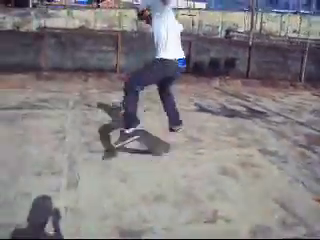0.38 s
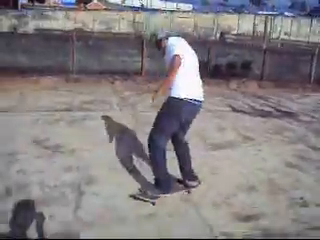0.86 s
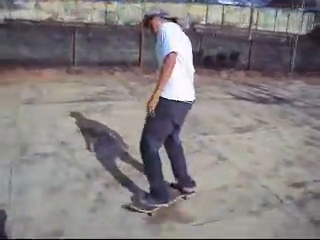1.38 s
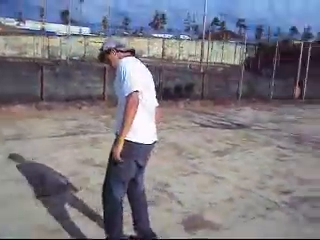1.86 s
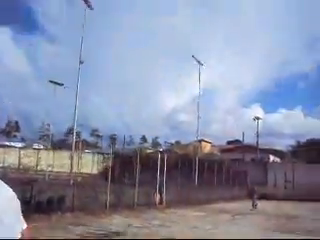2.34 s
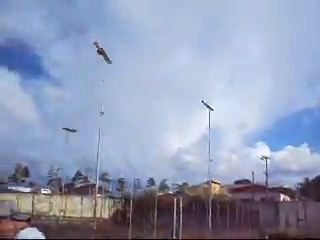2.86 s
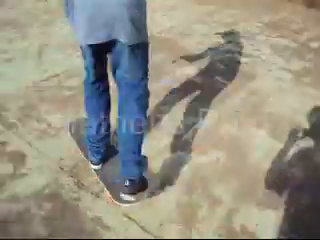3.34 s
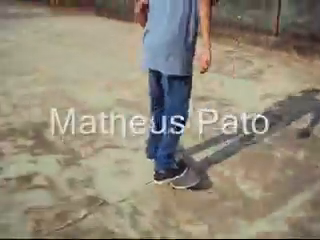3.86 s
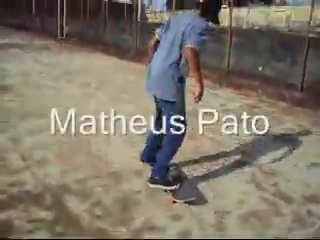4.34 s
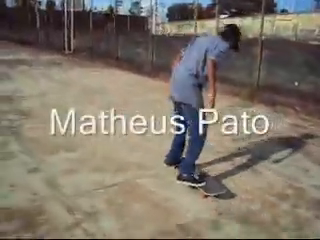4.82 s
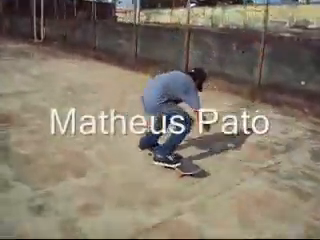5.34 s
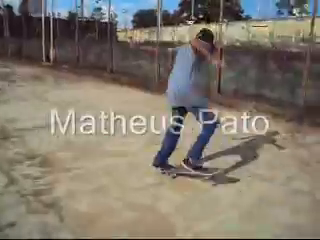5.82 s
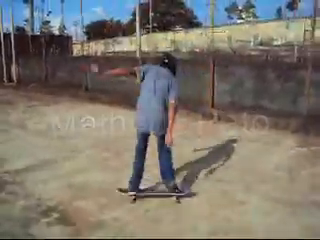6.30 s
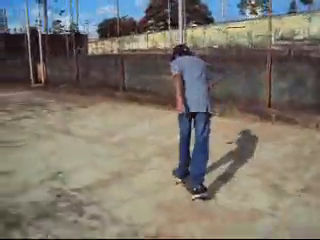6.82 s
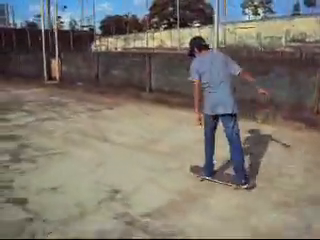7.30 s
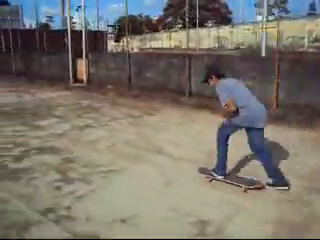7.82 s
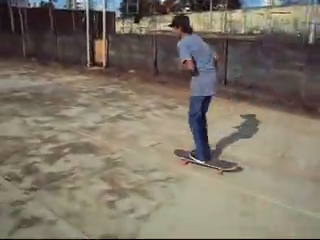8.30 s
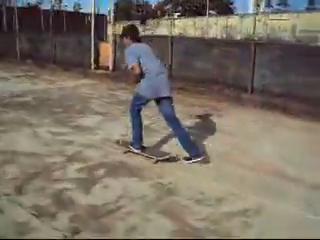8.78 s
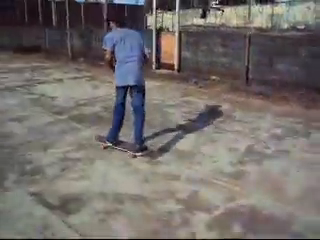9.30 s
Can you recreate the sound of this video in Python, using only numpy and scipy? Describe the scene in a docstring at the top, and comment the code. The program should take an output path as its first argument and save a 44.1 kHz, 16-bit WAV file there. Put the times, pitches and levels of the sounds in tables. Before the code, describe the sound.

A skateboard rolls gritty and low over rough concrete, clicking across cracks, then slams down in a cluster of hard clacks. Rolling eases, a faint engine speeds up far off, and the scene cuts abruptly to another board with a stamp, softer rolling, a louder landing and late knocks. Open court, light wind, low walls answering briefly, cheap small-camera microphone.

```python
"""A skateboard rolls over rough concrete in an open court, heard through a small camera.
From the start, grit drives the deck, wheels and trucks as filtered noise, under wind and open air; cracks,
clacks and hard contacts strike decaying modes, low walls answer, and shoe or wheel scuffs ring the metal.
A far engine, a swept tone, speeds up until the scene cuts to another rider and board at 3.2 s; soles stamp, a
bearing hisses in narrow noise, and the board lands hard again. The camera samples slowly, holds and clips."""
import sys
import numpy as np
from scipy import signal
from scipy.fft import rfft, irfft, next_fast_len
from scipy.io import wavfile
from scipy.ndimage import map_coordinates

SR = 44100
rng = np.random.default_rng(int(sys.argv[2]) if len(sys.argv) > 2 else 0)


def volts_from_db(level):
    """Convert decibel levels to linear amplitude ratios."""
    exponent = np.asarray(level, float) / 20
    return 10 ** exponent


def waveform_to_disk(signal):
    """Save audio, clipped to [-1, 1], as 16-bit WAV at the path in sys.argv[1]."""
    frames = np.transpose(np.atleast_2d(signal))
    scaled = np.clip(frames, -1, 1) * 32767
    samples = np.round(scaled).astype(np.int16)
    wavfile.write(sys.argv[1], SR, samples)


N = 426447

# What the board rings with, from the low body to the metal.
# Each row: centre in Hz, width in Hz before damping, relative level in dB.
RUMBLE_MODES = [(124, 97, -1), (152.7, 42.5, 7)]
FLEX_MODES = [(214, 246, 0.017), (387, 307, 0)]
DECK_MODES = [(490, 99, -5.5), (621, 152, 3), (658.5, 191, 1.5)]
NOSE_MODES = [(840, 62, 9.5), (980, 187, 4.5), (1167, 160, 6.5), (1202, 30, -2.5), (1350, 157, -7.5)]
WHEEL_MODES = [(1593, 870, 1), (2100, 1300, -2.3)]
TRUCK_MODES = [(2530, 560, -4), (2750, 230, 0.5), (3240, 250, -2.5), (3630, 127, -1.5), (4800, 3000, -11.5)]
# A sole stamps on the board. Each row: start in seconds, strength in dB before each part's own share.
SOLE_THUDS = [(1.35, -17.5), (3.215, -14), (4.08, -12), (4.101, -9), (6.264, -10), (6.276, -10)]


def unit(x):
    """Scales a sound to rms 1."""
    return x / np.sqrt(np.mean(x ** 2, -1, keepdims=True) + 1e-20)


def along(points, hz):
    """Reads a curve of (Hz, value) points on a log frequency axis."""
    f, v = np.transpose(points)
    return np.interp(np.log(hz + 1), np.log(f + 1), v)


def wobble(rate):
    """A smooth random curve, rate knots a second."""
    knots = rng.standard_normal(int(N * rate / SR) + 4)
    return map_coordinates(knots, [np.arange(N) * rate / SR])


def filtered(x, response):
    """Filters x by a complex response of frequency."""
    m = next_fast_len(N + SR // 2)
    return irfft(rfft(x, m) * response(np.fft.rfftfreq(m, 1 / SR)), m)[..., :N]


def resonance(f, hz, width_hz):
    """One causal resonance on the frequency grid f."""
    return 1j * f * width_hz / (hz * hz - f * f + 1j * f * width_hz)


def ringing(x, modes, steep):
    """Drives a row of modes with x; a wide resonance applied twice steepens the skirts."""
    low, high = modes[0][0], modes[-1][0]

    def response(f):
        skirt = resonance(f, np.sqrt(low * high), steep * high) ** 2
        # neighbouring modes alternate in sign
        row = sum((-1) ** k * volts_from_db(db) * resonance(f, hz, width) for k, (hz, width, db) in enumerate(modes))
        return skirt * row

    return filtered(x, response)


def grit(per_second, spread_db, hiss):
    """Stones under the wheels: scattered pushes of unequal size over fine sand."""
    hit = rng.random(N) < per_second / SR
    size = volts_from_db(spread_db * np.minimum(rng.exponential(size=N), 4)) * rng.standard_normal(N)
    return unit(unit(hit * size) + hiss * rng.standard_normal(N))


def rolling():
    """Rough and smooth patches of ground shake each part of the board; its low body booms as the load shifts."""
    # Two lists, first one rider and then another.
    # Each row: time in seconds, rolling strength in dB, ring of the deck in dB.
    rides = [
        [(0.0, -36, -29), (0.38, -36, -28), (0.74, -36, -30), (0.89, -39.5, -37.5), (1.15, -44.5, -38),
         (1.43, -43.5, -32.5), (1.82, -43.5, -37.5), (2.02, -37.5, -34), (2.6, -45, -33), (3.06, -41.5, -32.5),
         (3.19, -44.5, -29)],
        [(3.2, -38, -42), (3.36, -42.5, -51), (3.79, -35.5, -61), (4.05, -48.5, -61), (4.3, -43.5, -42.5),
         (4.62, -42.5, -29), (4.91, -44.5, -38.5), (5.42, -42.5, -33), (5.85, -43, -32), (6.32, -36.5, -31),
         (7.02, -44.5, -35), (7.78, -41.5, -33.5), (8.41, -44.5, -35), (8.86, -33.5, -27.5), (9.11, -40.5, -30),
         (9.49, -36.5, -27), (9.67, -42, -27)],
    ]
    # Treble of the ride. Each row: time in seconds, wheels in dB, trucks in dB.
    whir = [(0.0, -62, -53), (0.75, -69, -53), (0.94, -57, -62), (1.35, -72, -61.5), (3.01, -73, -63),
            (3.34, -63, -56.5), (3.74, -54.5, -62), (4.66, -49.5, -55.5), (5.3, -65, -60), (6.57, -62, -58),
            (7.41, -70, -68.5), (8.73, -59.5, -60), (8.83, -48, -56.5), (9.67, -78, -58)]
    # Booms under a shifting load. Each row: peak in seconds, rise in seconds, fall in seconds, level in dB.
    load_booms = [(.45, .5, 0.41, -45), (1.47, 0.29, .15, -42), (2.1, 0.22, 0.32, -47),
                  (3.3, 0.14, 0.54, -38), (4.08, 0.066, 0.18, -32), (5.15, 0.46, 0.64, -35),
                  (6.1, 0.14, 0.28, -32.5), (6.45, 0.48, 0.21, -31.5), (7.63, 0.56, 0.31, -36),
                  (8.85, 0.14, 0.16, -36)]
    rumble_db, flex_db, nose_db = -5.5, 1, -0.56  # over the rolling strength

    t = np.arange(N) / SR
    s, *controls = np.vstack(rides).T
    strength_db, deck_db = [np.interp(t, s, c) for c in controls]
    s, *treble = np.transpose(whir)
    wheels_db, trucks_db = [np.interp(t, s, c) for c in treble]
    boom = sum(volts_from_db(db) * np.interp(t, [s - rise, s, s + fall], [0, 1, 0]) ** 2
               for s, rise, fall, db in load_booms)
    levels = [volts_from_db(strength_db + rumble_db) + boom, volts_from_db(strength_db + flex_db), volts_from_db(deck_db),
              volts_from_db(strength_db + nose_db), volts_from_db(wheels_db), volts_from_db(trucks_db)]

    ground_db = 1.04 * wobble(9.0) + 1.63 * wobble(40)
    stones = grit(per_second=500, spread_db=0.5, hiss=0.95)
    parts = [RUMBLE_MODES, FLEX_MODES, DECK_MODES, NOSE_MODES, WHEEL_MODES, TRUCK_MODES]
    felt = [0.12, 0.37, 1.37, 0.82, 3.6, 0.91]  # stones shake the stiff parts; soft low modes average them
    out = np.zeros(N)
    for modes, level, share in zip(parts, levels, felt):
        own = 0.92 * rng.standard_normal(N)  # each part also feels its own wheel
        roughness = volts_from_db(ground_db + 0.92 * wobble(12))
        out += level * unit(ringing(roughness * (share * stones + own), modes, steep=1.13))
    return out


def air():
    """Open air as shaped noise, wind buffeting as low resonant noise, and a far engine as a gliding tone."""
    # Wind and far town. Each row: frequency in Hz, relative noise density in dB.
    background = [(15, -29), (25, -6), (49, -4.5), (173, 2.5), (242, -1), (340, -11.5), (570, -5.5),
                  (697, -2.5), (2880, -37), (3290, -25), (5400, -65), (7020, -72), (11900, -120)]
    # Buffeting on the microphone. Each row: time in seconds, level in dB before gusts.
    buffeting = [(0.0, -33.5), (0.62, -38.5), (0.99, -45), (2.96, -45), (3.37, -53), (4.87, -62),
                 (8.05, -46.5), (8.6, -47), (8.85, -42.5), (9.67, -47)]
    # Far engine. Each row: time in seconds, pitch in Hz before wander, level in dB before wander.
    far_engine = [(1.55, 81.2, -41.5), (2.2, 81.5, -44), (2.546, 88.8, -35), (2.8, 92, -41.5),
                  (3.2, 97, -37)]
    gust_db = 2.5

    t = np.arange(N) / SR
    noise = unit(filtered(rng.standard_normal(N), lambda hz: volts_from_db(along(background, hz))))
    noise_level = volts_from_db(-42.5 + 0.64 * wobble(2.46))

    wind = unit(ringing(rng.standard_normal(N), [(44.6, 11, 0), (83, 180, 0)], steep=2.05))
    wind_level = volts_from_db(np.interp(t, *np.transpose(buffeting)) + gust_db * wobble(2.44))

    s, hz, db = np.transpose(far_engine)
    phase = 2 * np.pi * np.cumsum(np.interp(t, s, hz) + 0.74 * wobble(4.0)) / SR
    engine_level = volts_from_db(np.interp(t, s, db, -120, -120) + 2.8 * wobble(8.96))
    engine = engine_level * (np.sin(phase) + 0.13 * np.sin(phase / 2))
    return noise_level * noise + wind_level * wind + engine


def contacts():
    """All blows as (s, deck dB, flex dB, nose dB, metal dB, metal ring Hz, contact s, damping)."""
    # Wheels drop into cracks. Each row: start in seconds, deck in dB, flex in dB, metal in dB.
    cracks = [(.214, 0.5, -6, -25), (.424, -8, -12, -40), (.595, -16, -9, -48), (1.399, -8, -21, -25),
              (1.865, -12, -29, -53), (2.01, -11.5, -18, -36), (2.235, -15, -41, -32),
              (2.533, -9.5, -14, -34), (2.56, 0, -5.5, -25.5), (2.577, -8.5, -27, -45),
              (2.756, -5.5, -7.5, -31), (5.054, -3, -2.5, -28), (5.31, -11, -10, -40),
              (5.698, -11, -42, -23.5), (6.254, -11, -28, -33), (6.267, -16.5, -10, -47),
              (6.626, -13, -14, -23.5), (7.61, -15.5, -27, -50), (7.791, -23, -13.5, -46),
              (8.691, 3.2, -11, -24), (8.745, -12, -21, -33), (8.765, -8, -22, -29), (8.794, -13, -27, -42),
              (9.122, -22, -28, -31), (9.306, -10, -34, -33), (9.336, -7, -31, -38)]
    # An edge or axle clacks, or the nose rattles under a scuff.
    # Each row: start in seconds, nose in dB, metal in dB, body in dB.
    clacks = [(.722, -21, -12.5, -18), (0.896, -15.5, -28, -31), (2.053, -17, -19, -10),
              (2.033, -16, -35, -26), (2.038, -20, -34, -30), (2.063, -20, -36, -22),
              (2.075, -23, -35, -26), (2.268, -23, -36, -16), (2.279, -20, -38, -26),
              (2.296, -21, -34, -26), (2.974, -17, -16.5, -28), (2.993, -11, 0.5, -14),
              (3.013, -21, -5, -19), (3.423, -13.5, -13, -26), (4.06, -21.5, -42, -38),
              (4.079, -16.5, -28, -27), (5.114, -23, -36, -14), (5.322, -25, -23, -13),
              (5.646, -18, -28, -24), (6.043, -14.5, -6, -16), (6.796, -9, -16.5, -42),
              (6.822, -18.5, -40, -37), (7.43, -20.5, -38, -35), (8.934, -27, -23, -14),
              (9.251, -31, -38, -38)]
    # Hard contacts: board landings, and a foot set down at 3.88 s.
    # Each row: start in seconds, deck in dB, flex in dB, nose in dB, metal in dB.
    hard_contacts = [(.819, -7, 1.5, 0, -6.5), (.823, -2.5, -29, -26, -20), (.828, -6, -0.5, 0, -9),
                     (.852, -25, 3.5, -4, -11), (.859, -18, -15, 9, -1), (0.874, -16, -3, -32, -38),
                     (3.88, -9.5, -26, -11, -27), (3.884, -7, -24, -13, -26), (6.364, -18, -10, -7, -20),
                     (6.372, -16, -16, -20, -22), (6.385, -17, -9, -8, -19), (6.398, 4.5, -3, 2.5, -1.5),
                     (6.418, -5, 4, 1, -1), (6.425, 6.5, -21, -23, -7), (6.431, 2.5, -15, 1.5, 2.5),
                     (6.452, -27, -6, -9, -29), (8.679, -2.6, -4, -11, -37), (8.846, 2.5, -13, -30, -18),
                     (8.858, 7, -25, -30, -13.5), (8.869, -10, -15, -25, -34)]
    # Share of each part under a sole: deck, flex, nose and metal, in dB.
    sole_db = [-31, -1.5, -17, -27]
    # Ring of the metal in hard contacts: first board in Hz, second board in Hz.
    hard_hz = [3100, 2180]
    second_s = 3.2  # when the scene cuts to the other rider and board
    crack_nose_db, clack_flex_db = -9.5, -8  # nose over the metal, flex under the body
    crack_hz, clack_hz = 2690, 1900  # ring of the metal
    contact_s, clack_s = 0.0035, 0.0031  # grinding at 0 dB, before each part's share; hard edges part sooner
    damping, clack_damping = 1.4, 2.2  # widening of the modes under load; a pinched edge rings least

    usual = (crack_hz, contact_s, damping)
    blow_list = [(s, deck, flex, metal + crack_nose_db, metal, *usual) for s, deck, flex, metal in cracks]
    blow_list += [(s, body, body + clack_flex_db, nose, metal, clack_hz, clack_s, clack_damping)
                  for s, nose, metal, body in clacks]
    blow_list += [(s, *np.add(db, sole_db), *usual) for s, db in SOLE_THUDS]
    blow_list += [(*row, hard_hz[int(row[0] > second_s)], contact_s, damping) for row in hard_contacts]
    return blow_list


def struck(modes, damping, hard):
    """Spectrum of one blow: modes start together at new strengths; a rounded contact cuts far above them."""
    hz, width, db = np.transpose(modes)[..., None]
    t, f = np.arange(4096) / SR, np.fft.rfftfreq(8192, 1 / SR)
    luck = rng.standard_normal((2, *hz.shape))
    strength = width * volts_from_db(db + 3 * luck[0])
    decay = np.exp(-np.pi * width * damping * t)
    ring = strength * np.cos(2 * np.pi * hz * t + 0.62 * luck[1]) * decay
    rounded = np.exp(-(f / (hard * hz.max())) ** 2 - 2j * np.pi * f * .001)  # with 1 ms of delay
    whole = rfft(ring.sum(0), 8192) * rounded
    return whole / abs(irfft(whole)).max()


def blows():
    """Each blow is a sharp push and a short grinding contact, slightly longer the harder it is."""
    t, out = np.arange(4096) / SR, np.zeros(N + 8192)
    linger = [1.28, 0.97, 1.3, 1.1]  # contact time as deck, flex, nose and metal feel it
    for s, *db, ring_hz, contact_s, damping in contacts():
        seconds = contact_s * volts_from_db(0.067 * max(db))
        noise = rng.standard_normal(len(t))
        # the metal that was hit rings most: 12 dB less for each octave away
        metal = [(hz, width, level - 12 * abs(np.log2(hz / ring_hz)))
                 for hz, width, level in WHEEL_MODES + TRUCK_MODES]
        parts = [DECK_MODES, RUMBLE_MODES + FLEX_MODES, NOSE_MODES, metal]
        for modes, part_db, slow in zip(parts, db, linger):
            grind = 0.41 * noise * np.exp(-t / (slow * seconds))
            grind[0] -= 3.5  # the sharp push
            force = rfft(grind / np.linalg.norm(grind), 8192)
            out[round(s * SR):][:8192] += volts_from_db(part_db) * irfft(force * struck(modes, damping, hard=1.52))
    # the blows carry little deep bass
    return filtered(out[:N], lambda f: (1j * f / (125 + 1j * f)) ** 2)


def walls(x):
    """The low walls send back a short diffuse tail, in which the lows linger longest."""
    # Decay of the tail. Each row: frequency in Hz, time to fall by 60 dB in seconds.
    wall_decay = [(200, 0.2), (1500, 0.074), (5000, 0.11)]
    hz, t, z = signal.stft(rng.standard_normal(SR // 2), SR, nperseg=256)
    fade = volts_from_db(-60 * t / along(wall_decay, hz)[:, None])
    tail = signal.istft(z * fade, SR, nperseg=256)[1]
    late = np.pad(x, (600, 0))  # 600 samples on the way
    return signal.fftconvolve(late, tail / np.linalg.norm(tail))[:N]


def scuffs():
    """Bursts of coarse grains that start fast and fade, ringing wheels and trucks."""
    # Scuffs of shoe, wheel and loose trucks.
    # Each row: start in seconds, length in seconds, wheels in dB, trucks in dB, both before the stroke's shape.
    scrapes = [(0.464, 0.054, -42, -38.5), (1.989, 0.2, -44, -43.5), (2.253, 0.086, -50, -42),
               (3.024, 0.029, -40, -41), (3.88, 0.069, -34, -59), (4.423, 0.037, -37, -38.5),
               (5.118, 0.049, -38, -42), (5.315, 0.067, -36.5, -44), (6.055, 0.065, -30, -37),
               (6.416, 0.078, -18, -33), (6.48, .05, -51, -40), (6.812, 0.053, -37, -43),
               (7.436, 0.048, -36, -45), (8.677, 0.027, -43, -28.5), (8.851, 0.044, -36, -30.5)]
    t, stroke = np.arange(N) / SR, np.zeros((2, N))
    for s, length, *db in scrapes:
        shape = np.interp((t - s) / length, [0, .1, .7, 1], [0, 0.56, 0.11, 0])
        stroke += np.outer(volts_from_db(db), shape)
    grains = grit(per_second=910, spread_db=4, hiss=0.91)
    wheels, trucks = [unit(ringing(grains, modes, steep=3.0)) for modes in (WHEEL_MODES, TRUCK_MODES)]
    return stroke[0] * wheels + stroke[1] * trucks


def stamps():
    """The ground's dull answer to a sole: each thud also leaves one low, quickly damped swing."""
    swing_hz, t60_s, level_db = 93, 0.066, -8.5  # level over the thud
    t, pushes = np.arange(SR // 4) / SR, np.zeros(N)
    s, db = np.transpose(SOLE_THUDS)
    pushes[np.round(s * SR).astype(int)] = volts_from_db(db + level_db)
    swing = np.sin(2 * np.pi * swing_hz * t) * volts_from_db(-60 * t / t60_s)
    return signal.fftconvolve(pushes, swing)[:N]


def squeaks():
    """A bearing hisses: noise in a narrow band swells and stops."""
    # Each row: start in seconds, length in seconds, level in dB at the top of the swell.
    hisses = [(3.837, 0.046, -51), (3.98, .04, -56), (6.498, 0.037, -50), (6.96, .06, -56),
              (7.038, 0.1, -50.5), (7.22, .11, -61), (9.576, 0.068, -51)]
    # The bearing's band. Each row: centre in Hz, width in Hz, level in dB.
    bearing = [(3450, 380, 0)]
    t = np.arange(N) / SR
    swell = sum(volts_from_db(db) * np.interp((t - s) / length, [0, .6, 1], [0, 1, 0]) for s, length, db in hisses)
    return swell * unit(ringing(rng.standard_normal(N), bearing, steep=.4))


def scene():
    """Mixes the rolling board, its knocks with their echo, and the air."""
    knocks = blows() + stamps() + scuffs() + squeaks()
    echo = volts_from_db(-19.5) * walls(knocks)
    return (rolling() + knocks + echo + air())[None]


def low_pass(x):
    """Removes everything above the highest recorded frequency."""
    return signal.sosfilt(signal.butter(12, 12660, fs=SR, output="sos"), x)


def record(dry):
    """Low-pass, clipping and slow sampling held in steps: mirrors of the sound appear around the sampling rate."""
    hold_hz = 11026
    x = filtered(dry, lambda hz: 1 / np.sqrt(1 + (hz / 4900) ** 12))
    x = x + volts_from_db(-60.5) * rng.standard_normal(x.shape) + 0.0061  # converter hiss and offset
    clipped = x / (1 + abs(x / 1.08) ** 8) ** (1 / 8)
    step = np.floor(np.arange(N) * hold_hz / SR)
    held = clipped[:, np.ceil(step * SR / hold_hz).astype(int)]
    return low_pass(held)


dry = scene()
out = record(dry)
waveform_to_disk(out)
```